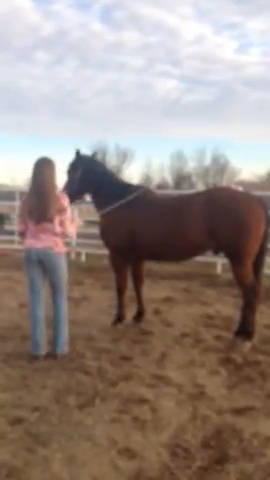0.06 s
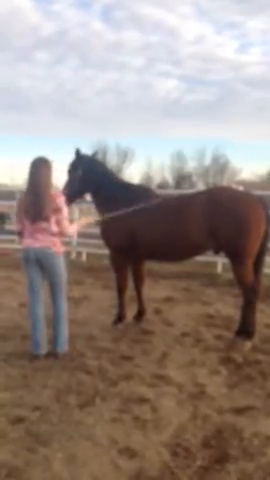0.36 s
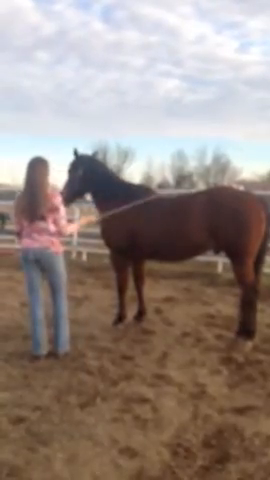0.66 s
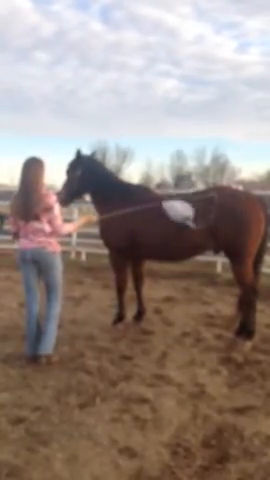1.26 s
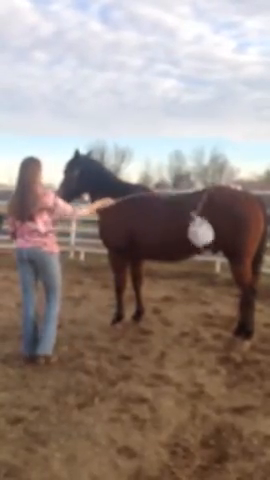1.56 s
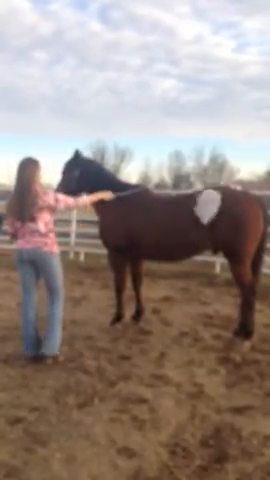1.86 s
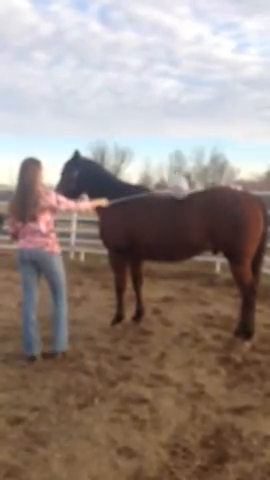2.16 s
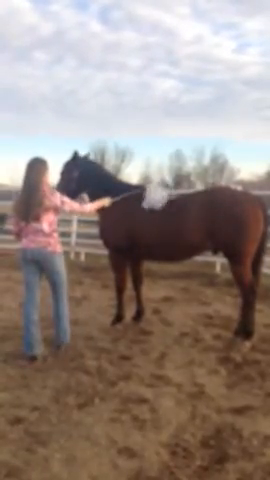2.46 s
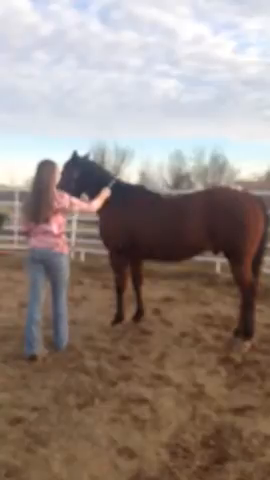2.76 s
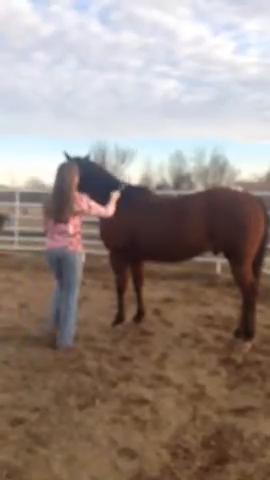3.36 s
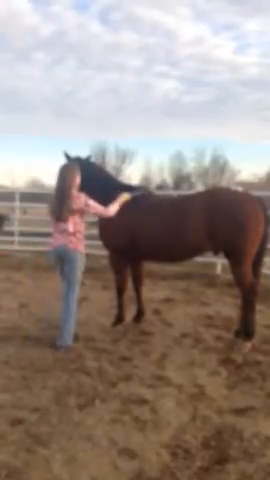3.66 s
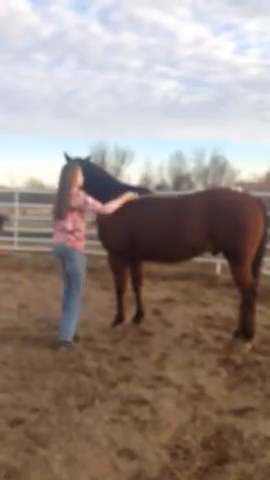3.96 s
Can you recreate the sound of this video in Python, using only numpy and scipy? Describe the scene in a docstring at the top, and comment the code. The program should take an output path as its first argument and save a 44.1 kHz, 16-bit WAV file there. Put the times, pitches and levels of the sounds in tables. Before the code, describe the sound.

A plastic bag rustles and swishes while gusts of wind buffet the microphone.

```python
"""A thin plastic bag on a stick, swished over a horse's back a few metres from the microphone.
Its creases buckle and snap over the hiss of sliding film. The place is an open paddock, and
gusts buffet the microphone with rumble, thumps and pops. Far traffic fades, a distant engine
hums, and a small bird repeats a three-note call among lone chirps. Two sharp ticks cut through."""
import sys
import numpy as np
from scipy import signal
from scipy.fft import rfft, irfft, next_fast_len
from scipy.io import wavfile
from scipy.ndimage import uniform_filter1d, map_coordinates

SR = 44100
rng = np.random.default_rng(int(sys.argv[2]) if len(sys.argv) > 2 else 0)


def generate_wav(sig):
    """Save sig (samples, or channels by samples) to the path in sys.argv[1] as 16-bit PCM at SR."""
    pcm = np.round(np.clip(np.atleast_2d(sig).T, -1, 1) * 32767).astype(np.int16)
    wavfile.write(sys.argv[1], SR, pcm)


N = 176400


def amp(db):
    """Decibels to gain."""
    return 10 ** (np.asarray(db) / 20)

def unit(x):
    """Scale to rms 1."""
    return x / np.sqrt(np.mean(x ** 2) + 1e-20)

def clock():
    """The time of every sample."""
    return np.arange(N) / SR

def curve(rows):
    """(t/s, value) points joined by lines."""
    return np.interp(clock(), *np.transpose(rows))

def wobble(rate):
    """A smooth random curve, rate knots a second."""
    return map_coordinates(rng.standard_normal(N), [clock() * rate + 2])

def filtered(x, response):
    """x times a response of frequency."""
    m = next_fast_len(N + SR // 2)
    return irfft(rfft(x, m) * response(np.fft.rfftfreq(m, 1 / SR)), m)[:N]

def coloured(x, points):
    """x through an (f/Hz, level/dB) spectrum, at rms 1."""
    f, db = np.transpose(points)
    return unit(filtered(x, lambda hz: amp(np.interp(np.log(hz + 1), np.log(f), db))))

def noise(points):
    """Noise with an (f/Hz, level/dB) spectrum, at rms 1."""
    return coloured(rng.standard_normal(N), points)

def bursts(rows, decay_s):
    """An envelope that jumps at each (t/s, level/dB) and dies away."""
    t = clock()
    return sum(amp(db) * (t >= s) * np.exp(-abs(t - s) / decay_s) for s, db in rows)


# gusts on the microphone: t/s, level/dB
GUSTS = [(0, -48.5), (.3, -46), (.4, -53), (.52, -46.5), (.63, -53.5), (.92, -41.5), (1.2, -51.5),
         (1.44, -51.5), (1.54, -63.5), (1.8, -56), (2.2, -61), (2.3, -56.5), (2.44, -62.5), (3.12, -54),
         (3.25, -44.5), (3.5, -54), (3.74, -48), (4, -44)]
# their spectrum: f/Hz, relative level/dB
GUST_SPECTRUM = [(20, -29.5), (35, -3), (55, 6.5), (110, 1), (190, -0.5), (270, -9.5), (350, -24.5),
                 (440, -40), (2000, -57)]

def wind(swing_db=2):
    """Wind right on the microphone: an unsteady low rumble that follows the gusts."""
    return amp(curve(GUSTS)) * unit(amp(swing_db * wobble(rate=35)) * noise(GUST_SPECTRUM))


# far traffic: t/s, level/dB
TRAFFIC_FADE = [(0.0, -62), (0.33, -61.5), (4.0, -76.5)]
# tyre noise as it reaches the paddock: f/Hz, relative level/dB
TYRE_SPECTRUM = [(100, 2.5), (600, -3), (1150, 2.5), (1700, 1), (2750, -3.5), (3250, -15), (7000, -36.5),
                 (15000, -56)]

def traffic():
    """Tyres on a far road, fading away."""
    return amp(curve(TRAFFIC_FADE) + 0.45 * wobble(rate=5.58)) * noise(TYRE_SPECTRUM)


# tones of the engine, before the swell: f/Hz, level/dB
ENGINE_TONES = [(86, -60.5), (134, -62), (167, -66.5)]
# swell of the hum: t/s, gain/dB
ENGINE_SWELL = [(0, 4.5), (2.4, -10.5), (2.85, 0.5), (3.1, -3), (4, 9.5)]

def engine(wander=0.009):
    """A distant engine hums in three low tones, each drifting slightly in pitch."""
    hum = sum(amp(db) * np.sin(2 * np.pi * hz * np.cumsum(1 + wander * wobble(rate=16)) / SR)
              for hz, db in ENGINE_TONES)
    return np.sqrt(2) * hum * amp(curve(ENGINE_SWELL))


# background hiss: f/Hz, relative level/dB
HISS_SPECTRUM = [(500, 5), (3500, -4), (7000, -8), (15000, -12.5)]

def hiss(level_db=-73.5):
    """A faint, even hiss behind everything in the paddock."""
    return amp(level_db) * noise(HISS_SPECTRUM)


# eddies thumping the microphone: t/s, peak level/dB, f/Hz
EDDY_THUMPS = [(0.02, -35.5, 130), (.039, -29.5, 200), (0.081, -30.5, 90), (0.126, -43, 140),
               (.207, -35, 200), (.228, -32.5, 140), (0.252, -29, 115), (.302, -31.5, 110),
               (.468, -35, 160), (.543, -31.5, 150), (.716, -32.5, 130), (0.802, -38.5, 210),
               (0.827, -37.5, 200), (0.849, -32.5, 150), (0.932, -29, 105), (1.002, -30.5, 150),
               (1.407, -38.5, 85), (1.434, -36.5, 80), (1.49, -39.5, 110), (1.835, -44.5, 70),
               (2.032, -38.5, 136), (2.126, -38, 100), (3.171, -33, 125), (3.186, -28.5, 220),
               (3.217, -24.5, 110), (3.249, -22.5, 260), (3.257, -24, 130), (3.274, -28, 200),
               (3.299, -34, 220), (3.322, -38, 130), (3.396, -35.5, 150), (3.466, -42.5, 130),
               (3.666, -33, 115), (3.703, -32, 100), (3.751, -30.5, 250), (3.775, -29, 115),
               (3.805, -28.5, 180), (3.876, -21, 168), (3.901, -29, 175), (3.963, -35.5, 190)]
# ragged turbulence inside them: f/Hz, relative level/dB
TURBULENCE_SPECTRUM = [(60, 7), (330, 1.5), (520, -10.5), (800, -38.5), (2000, -75)]

def eddies(wander=0.1216, turbulence_db=-21, half_cycles=0.45, linger_cycles=0.96):
    """Single eddies push the diaphragm for a cycle or a few, the strong ones for longer."""
    t, out = clock(), np.zeros(N)
    swirl_time = np.cumsum(1 + wander * wobble(rate=100)) / SR
    turbulence = amp(turbulence_db) * noise(TURBULENCE_SPECTRUM)
    strongest_db = max(db for s, db, hz in EDDY_THUMPS)
    for (s, db, hz), turn in zip(EDDY_THUMPS, rng.random(len(EDDY_THUMPS))):
        half_s = (half_cycles + linger_cycles * amp(db - strongest_db)) / hz
        envelope = amp(db) * np.exp(-.5 * ((t - s) / half_s) ** 2)
        out += envelope * (np.sin(2 * np.pi * (hz * swirl_time + turn)) + turbulence)
    return out


# sharp ticks: t/s, level/dB
SHARP_TICKS = [(.1028, -47), (1.2813, -36)]

def ticks(ring_hz=9500, ring_s=.0001, tail_s=.0007, tail_db=-17):
    """Bright, dry ticks: a cycle or two, then a trace of crackle with the colour of the bag."""
    t = clock()
    ring = sum(bursts([(s, db)], ring_s) * np.sin(2 * np.pi * ring_hz * (t - s))
               for s, db in SHARP_TICKS)
    return ring + amp(tail_db) * bursts(SHARP_TICKS, tail_s) * noise(FILM_SPECTRUM)


# calls of the bird: t/s, level/dB
BIRD_CALLS = [(.278, -69.5), (0.834, -68), (2.542, -66.5), (3.467, -75.5), (3.985, -75.5)]
# notes of a call: delay/s, half length/s, top f/Hz, nominal arch/Hz, gain/dB
CALL_NOTES = [(0, .024, 4830, 1204, 0), (0.042, .012, 4390, 1295, 2.5), (0.086, .022, 3450, 460, -1.5)]
# lone chirps: t/s, top f/Hz, level/dB
LONE_CHIRPS = [(0.287, 3340, -70.5), (1.985, 3200, -65.5), (3.001, 3150, -68.5), (3.785, 3200, -71)]

def bird(waver_hz=105.5, chirp_half_s=0.021, chirp_arch_hz=305):
    """A small bird's arched whistles: three notes stepping down, or one chirp; no two bend alike."""
    t, out = clock(), np.zeros(N)
    waver = waver_hz * wobble(rate=270)
    notes = [(s + delay, half, top, arch, db + note_db)
             for s, db in BIRD_CALLS for delay, half, top, arch, note_db in CALL_NOTES]
    notes += [(s, chirp_half_s, top, chirp_arch_hz, db) for s, top, db in LONE_CHIRPS]
    for (s, half, top, arch, db), bend in zip(notes, rng.uniform(0.38, 2, len(notes))):
        on = abs(t - s) < half
        u = (t[on] - s) / half  # -1 to 1 across the note
        pitch_hz = top - bend * arch * u ** 2 + waver[on]
        out[on] += amp(db) * (1 - u ** 2) * np.sin(2 * np.pi * np.cumsum(pitch_hz) / SR)
    return out


def patchy(x, depth_db):
    """Each patch of film rings with its own short-lived colour."""
    spectra = signal.stft(x, nperseg=256)[2]
    colour = uniform_filter1d(rng.standard_normal(spectra.shape), size=5, axis=0)  # along frequency
    colour = uniform_filter1d(colour, size=4, axis=1)  # along time
    return signal.istft(spectra * amp(depth_db * unit(colour)), nperseg=256)[1][:N]


# swishes over the horse's back: peak t/s, rise/s, fall/s, level/dB
BAG_SWISHES = [(.95, 0.076, 0.053, -74), (1.11, 0.098, 0.38, -68.5), (1.345, .065, 0.12, -62.5),
               (1.501, 0.091, 0.085, -61), (1.611, 0.039, 0.026, -59.5), (1.787, 0.1, .024, -64.5),
               (1.934, 0.071, 0.022, -54), (2.07, 0.075, 0.22, -66.5), (2.276, 0.04, .025, -56.5),
               (2.345, 0.046, 0.071, -62), (2.53, 0.024, 0.015, -63), (2.61, 0.038, .11, -60),
               (2.711, 0.034, 0.022, -58), (2.8, .03, 0.047, -72.5), (2.872, .033, 0.09, -60),
               (3.08, .1, 0.09, -66.5), (3.222, 0.035, 0.042, -63), (3.57, 0.23, .09, -73.5),
               (3.78, 0.047, .022, -71)]
# single creases snapping: t/s, level/dB
CREASE_SNAPS = [(1.783, -52.5), (1.977, -54), (2.035, -54), (3.0, -61), (3.301, -61), (3.42, -64.5)]
# rustle of thin plastic film: f/Hz, relative level/dB
FILM_SPECTRUM = [(400, -2.5), (1000, -4.5), (2300, 1.5), (2800, -1.5), (3900, 2), (5400, -2.5), (8200, 0.5),
                 (10500, -3), (15000, -4)]

def bag(peak_creases_per_s=3400, spread_db=3.9, slide_db=1, flap_db=1.34):
    """A few metres off, tiny creases buckle, more densely when swung faster, over sliding film."""
    t = clock()
    swishes = (amp(db) * np.where(t < s, np.exp(-((t - s) / rise) ** 2), np.exp(-abs(t - s) / fall))
               for s, rise, fall, db in BAG_SWISHES)
    motion = np.sqrt(sum(swish ** 2 for swish in swishes))
    chance = peak_creases_per_s / SR * (motion / motion.max()) + 1e-4
    buckles = (rng.random(N) < chance) * rng.choice([-1, 1], N)
    strength = amp(spread_db * np.minimum(rng.exponential(size=N), 4))
    creases = coloured(buckles * strength / np.sqrt(chance), FILM_SPECTRUM)  # even power at any density
    slide = amp(slide_db) * noise(FILM_SPECTRUM)
    rustle = unit(patchy(creases + slide, depth_db=1.5))
    flap = amp(flap_db * wobble(rate=77))
    snaps = bursts(CREASE_SNAPS, decay_s=.005) * noise(FILM_SPECTRUM)
    return motion * flap * rustle + snaps


# sudden pressure jumps at the microphone: t/s, peak level/dB, f/Hz
PRESSURE_POPS = [(.935, -34, 272), (1.021, -46, 262), (1.039, -42.5, 268), (1.128, -39.5, 170),
                 (1.334, -35.5, 202), (3.242, -34, 220), (3.772, -32.5, 183), (3.857, -28, 172)]

def pops(roughness=0.19):
    """Each pop is one steep, ragged push and pull of the air at the microphone port."""
    t, out = clock(), np.zeros(N)
    for s, db, hz in PRESSURE_POPS:
        u = 2 * np.pi * hz * (t - s)
        out += amp(db) * u * np.exp((1 - u ** 2) / 2)
    return out * (1 + roughness * wobble(rate=500))


def paddock(x, echo_db=-9, t60_s=0.29):
    """Out in the open: the direct sound plus a weak, short scatter from ground and fence."""
    t = np.arange(SR // 2) / SR
    tail = rng.standard_normal(len(t)) * amp(-60 * t / t60_s)
    return x + amp(echo_db) * signal.fftconvolve(x, tail / np.linalg.norm(tail))[:N]

def scene():
    """All sources at one microphone in the paddock."""
    in_paddock = paddock(bag() + bird())
    on_microphone = wind() + eddies() + pops()
    background = traffic() + engine() + hiss()
    return (in_paddock + on_microphone + background + ticks())[None]

def record(dry, top_hz=15450):
    """The recorder keeps nothing above its band limit."""
    return np.array([filtered(x, lambda hz: hz < top_hz) for x in dry])


dry = scene()
out = record(dry)
generate_wav(out)
```